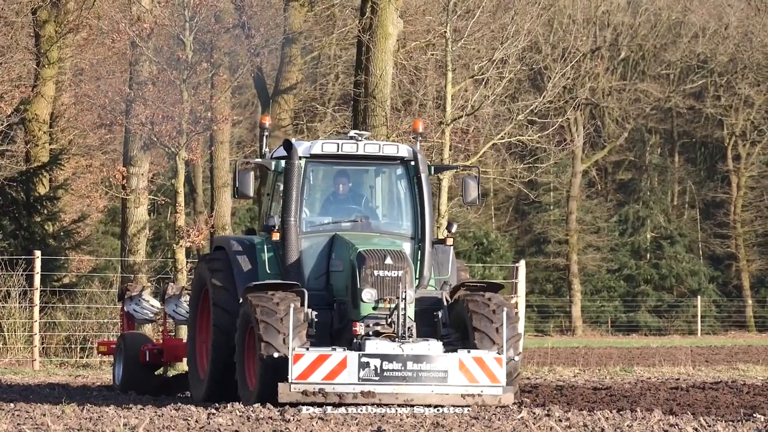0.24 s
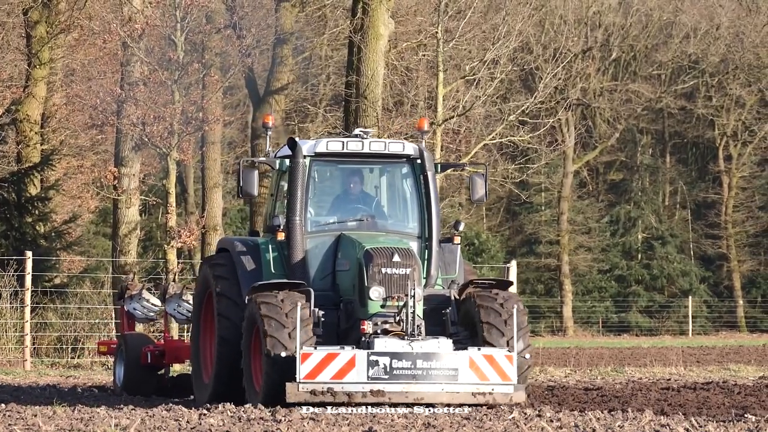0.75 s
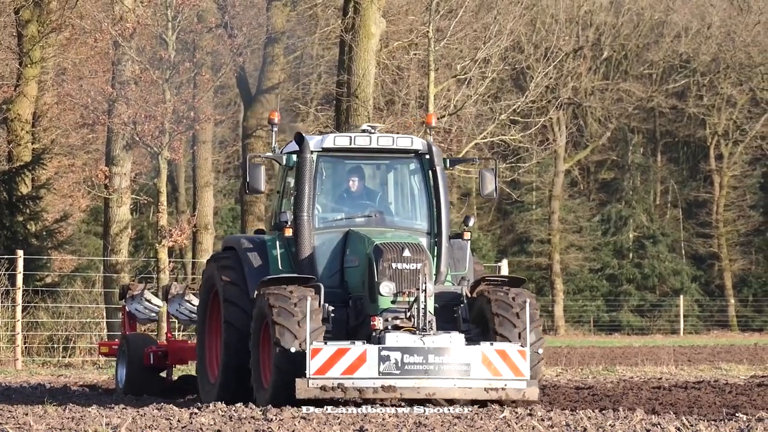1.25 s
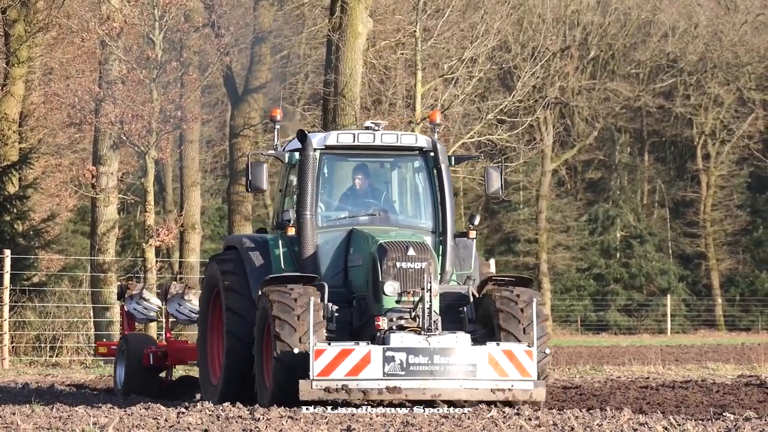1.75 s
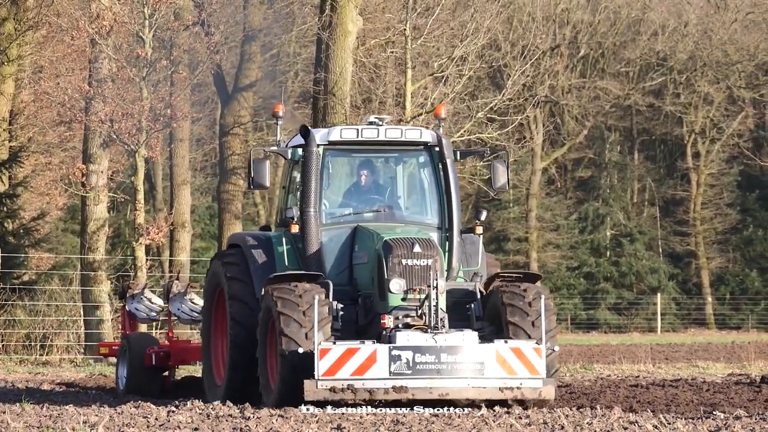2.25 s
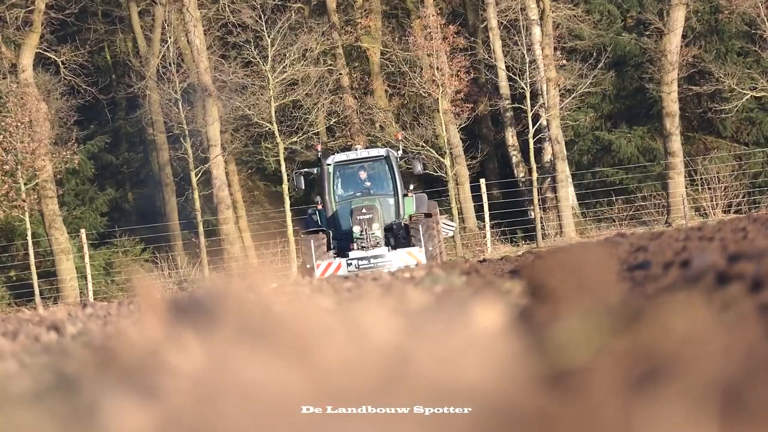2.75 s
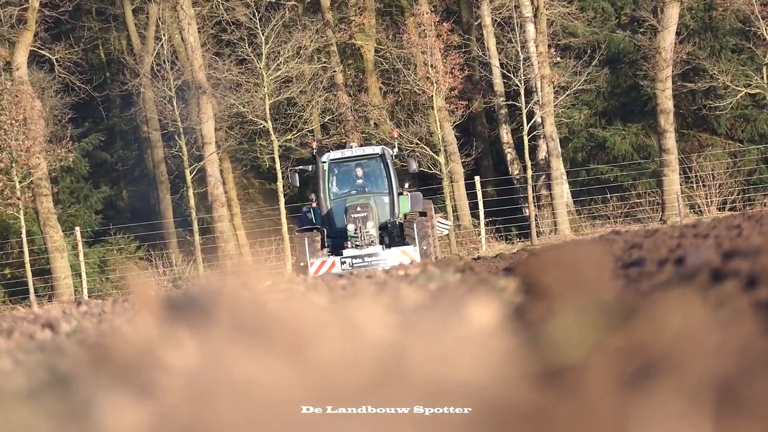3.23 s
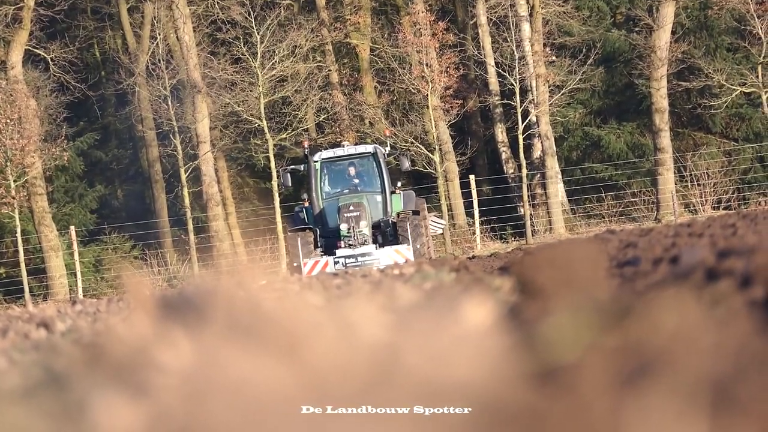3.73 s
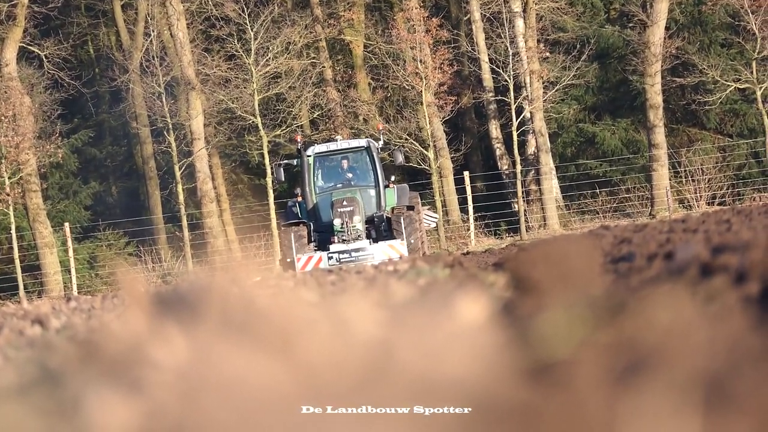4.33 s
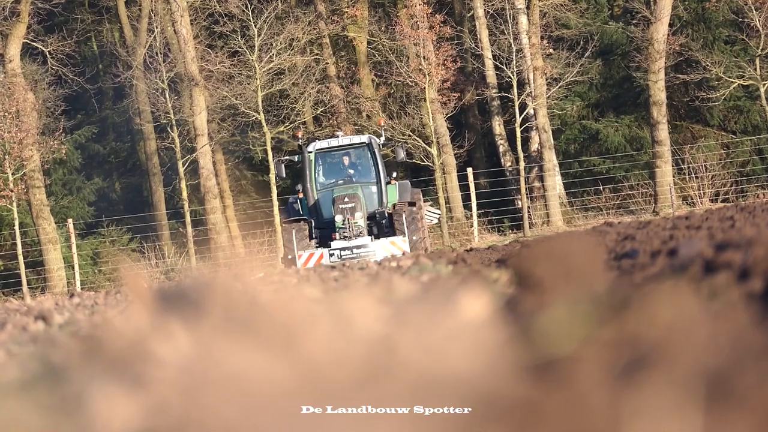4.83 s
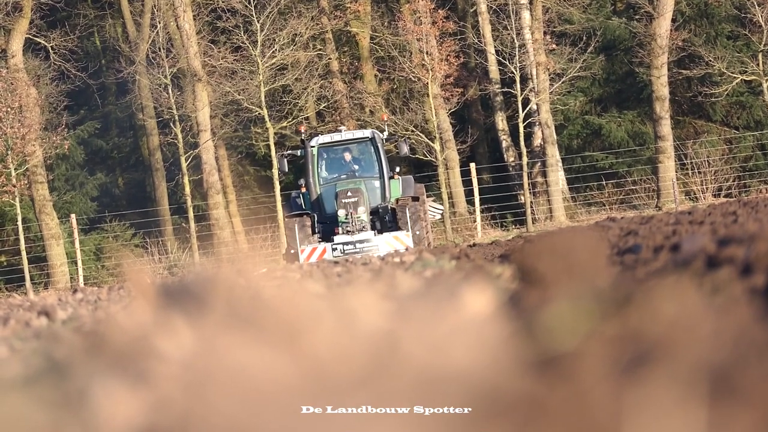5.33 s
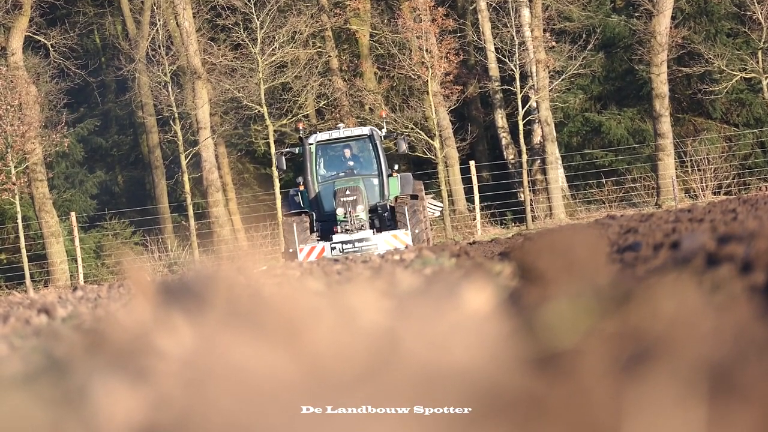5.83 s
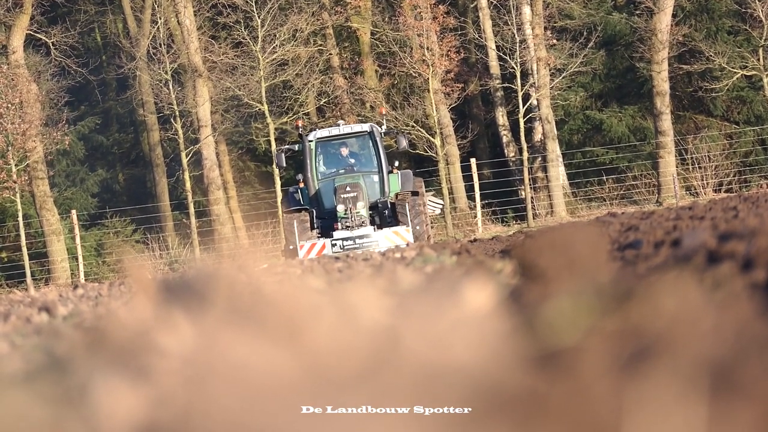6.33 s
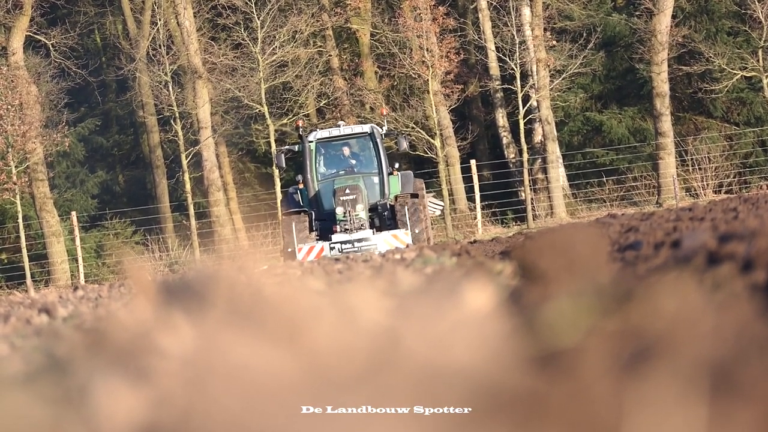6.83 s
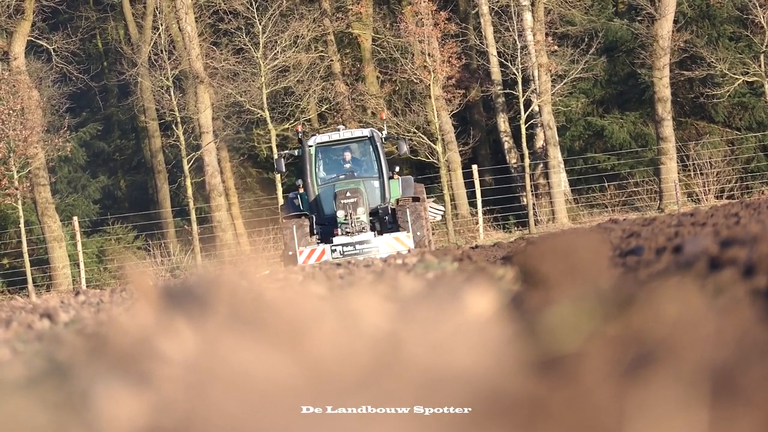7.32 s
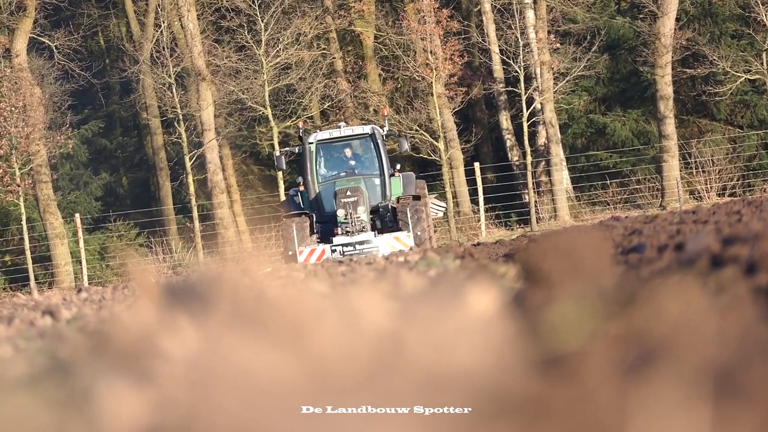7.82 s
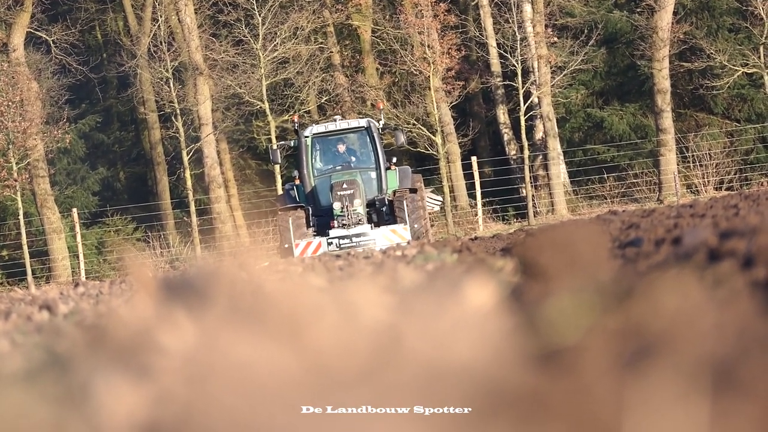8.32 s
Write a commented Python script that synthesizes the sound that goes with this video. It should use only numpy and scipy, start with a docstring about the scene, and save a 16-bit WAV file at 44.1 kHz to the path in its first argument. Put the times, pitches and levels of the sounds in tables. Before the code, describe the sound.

A diesel tractor under load pulls a plough. First close and loud: a dense, uneven, rasping chug, with a sizzling hiss that drops early and a low wind rumble towards the end. A quick crossfade leads to a far view at ground level, where the engine purrs softly and dully, its pace sagging and then rising, with faint high whines, small stone-on-steel chinks and one thin squeal. The tractor stays centred, with slight open-air diffusion.

```python
"""Tractor ploughing, near and far

A four-cylinder diesel pulls a plough across a field. With the microphone close by, every firing is
a thump (filtered click) with a barking, rasping puff of exhaust (gated noise), over rumble and sizzle.
Then the scene cuts to a spot low on the soil, far off: a soft throb under a wash of engine noise,
a hollow drone, ticks and thin whines (wavering tones), and chinks and one squeal of the plough.
Faint hiss lies under both views, and each has a faint, diffuse stereo tail."""
import sys
import numpy as np
from scipy import signal
from scipy.fft import rfft, irfft, next_fast_len
from scipy.io import wavfile

SR = 44100
rng = np.random.default_rng(int(sys.argv[2]) if len(sys.argv) > 2 else 0)


def wav_out(sig):
    """Save sig, one row per channel (or a flat mono array), as 16-bit PCM at SR to the path in sys.argv[1]."""
    wavfile.write(sys.argv[1], SR, np.round(np.clip(np.atleast_2d(sig).T, -1, 1) * 32767).astype(np.int16))


N = 377937
T = np.arange(N) / SR  # time of every sample [s]

# Engine pace in each view, sagging and recovering with the pull: (time [s], firing rate [1/s])
NEAR_SPEED = [(0.0, 42.95), (0.17, 43.97), (0.97, 44.61), (1.4, 42.55), (1.59, 42.3), (2.03, 42.92),
              (2.25, 44.13), (2.48, 42.01), (2.7, 42.05)]
FAR_SPEED = [(2.66, 49.9), (3.28, 49.12), (3.7, 50.56), (3.96, 49.94), (4.53, 47.77), (4.69, 46.47),
             (5.31, 53.29), (5.98, 52.21), (6.11, 51.42), (6.66, 52.57), (7.2, 54.16), (7.8, 53.23),
             (7.98, 52.3), (8.57, 53.3)]
# Cylinders in firing order: (thump [dB], puff [dB], lateness [firing intervals])
CYLINDERS = [(-0.6, -1.5, 0.0093), (-1.7, -2, -0.0028), (-0.4, -0.66, -0.019), (0, -1, -0.0039)]
# Firings that stand out close by: (time [s], extra bark [dB], extra rasp [dB])
STANDOUT_FIRINGS = [(.159, 1, 0.5), (.524, -2, 4.5), (.68, -2, 5), (1.337, 7, 2.5), (1.43, 3, -1.5),
                    (1.549, 2.5, 1.5), (1.597, 4, 3.5), (1.902, 7.5, -2), (2.065, 7, 3.5), (2.272, 3.5, 3),
                    (2.34, 4, -0.5), (2.457, 6.5, 1), (2.55, 9, 2.5), (2.623, 1, 3.5)]
# How hard the engine works close by: (time [s], thump level [dB], rasp level [dB])
NEAR_EFFORT = [(0.0, -27.5, -34.5), (0.67, -28, -34), (0.9, -30.5, -36.5), (1.02, -28.5, -33.5),
               (1.22, -27.5, -36), (1.37, -27.0, -32.5), (1.86, -28.0, -35), (2.7, -29, -37)]
# Level of the thump far off: (time [s], level [dB])
FAR_THUMP = [(2.7, -43), (3.9, -43.5), (4.41, -41), (5.26, -43), (5.38, -45.0), (6.85, -42), (7.74, -46),
             (7.95, -43.5), (8.57, -43.5)]
# Spectra, only their shape counts: (frequency [Hz], level [dB])
NEAR_PIPE = [(20, -68), (44, -16.5), (70, -7), (87, 0.5), (130, -4.5), (174, -2.5), (215, -4), (260, -23.5),
             (400, -23), (700, -25.5), (1500, -54), (3000, -83)]  # thump close by
FAR_PIPE = [(20, -35), (51, -8), (100, 1), (155, -2), (205, -11.5), (255, -25), (380, -38), (480, -49),
            (1500, -69), (3000, -98)]  # thump over the soil
BARK = [(60, -28), (140, -17), (200, -3), (260, -7.5), (400, -12.5), (600, -6.5), (900, -1), (1050, 0),
        (1170, 2.5), (1380, -4.5), (1850, -7), (2400, -22), (4500, -67)]  # lower part of the puff
RASP = [(900, -46), (1800, -9.5), (2200, 1), (2600, -4), (2930, 2.5), (3250, -4.5), (3650, -2.5),
        (4200, -14), (5100, -20.5), (5500, -25.5), (6200, -47), (7300, -41), (10500, -42.5), (14000, -95)]  # upper part of the puff
WASH = [(15, -7), (30, 12.5), (70, 4), (130, 5.5), (230, 7.5), (380, 5), (550, 0), (800, -2), (1150, 0),
        (1600, -4), (2000, -8), (2500, -9), (3000, -15.5), (3650, -16.5), (4400, -26), (7000, -43)]  # diffuse engine noise far off
RUMBLE = [(30, -37), (110, -7.5), (160, -2), (195, 4.5), (240, -2), (295, -1), (350, -8), (420, -9),
          (900, -52.5)]  # engine block and running gear
SIZZLE = [(2500, -36), (3350, -12), (3520, 16.5), (3650, -18), (3820, 10.5), (4200, 1), (5100, -5),
          (5480, -0.5), (6250, -9.5), (6520, -11.5), (6780, -14), (6940, -16), (7300, -27), (14000, -58)]  # narrow resonances of turbocharger and fan
HISS = [(30, -19), (3000, 2.5), (6000, 1.5), (10000, 0), (15500, -2.5)]  # even background hiss
# Hollow hum of the distant engine: (frequency [Hz], stray [Hz], level [dB])
DRONE = [(286, 6, -54), (344, 2.42, -60)]
# Thin whines of the drive: (frequency [Hz], width [Hz], level [dB], flutter [dB])
WHINES = [(2810, 66, -71.5, 4.5), (1640, 64, -71.5, 0), (3650, 70.6, -80, 5)]
# Short chinks, probably stones against the plough: (time [s], frequency [Hz], level [dB])
CHINKS = [(5.422, 3820, -53.5), (5.483, 3740, -55.5), (5.724, 2550, -52), (6.112, 3740, -62.5),
          (6.179, 3250, -61), (6.557, 2590, -54), (7.40, 3920, -65), (7.755, 3640, -60)]

CUT_S, CUT_LENGTH_S = 2.668, 0.057  # the near view fades into the far one
NEAR_START, FAR_START = 0.150, 0.886  # share of a firing interval already gone as each view starts
BARK_DB, BARK_FOLLOWS = -30.5, 0.43  # mean level; rise per dB that the rasp gains
WASH_DB, WASH_FOLLOWS = -49, 0.2  # mean level; rise per dB that the thump gains
SIZZLE_DB, SIZZLE_LATE_DB, SIZZLE_DROP_S, SIZZLE_DROP_LENGTH_S = -45.5, -52, 0.7, 0.2
DRONE_SWELL_DB, DRONE_SWELLS_PER_S = 5.5, 6.6
TICK_HZ, TICK_WIDTH_HZ, TICK_LAG_S = 5420, 220, 0.002
TICK_DB, TICK_LATE_DB, TICK_SINKS_S, TICK_SINK_LENGTH_S = -79, -87, 4, 0.3
CHINK_RISE_S, CHINK_T60_S = 0.002, 0.065
SQUEAL_S, SQUEAL_LENGTH_S, SQUEAL_DB = 6.87, 0.48, -70.5
SQUEAL_HZ, SQUEAL_SAG_HZ_PER_S = 3700, 170
EDGE_HZ = 15700  # upper band limit of the recorder


def amp(db):
    """Decibels to gain."""
    return 10 ** (np.asarray(db) / 20)


def evened(x):
    """Scales to rms 1."""
    return x / np.sqrt(np.mean(x ** 2) + 1e-20)


def curves(rows):
    """Each column of a time table, at every sample."""
    s, *columns = np.transpose(rows)
    return [np.interp(T, s, c) for c in columns]


def ramp(s, length_s):
    """Goes from 0 to 1 round the time s."""
    return np.clip((T - s) / length_s + 0.5, 0, 1)


def add(mix, s, sound):
    """Mixes a sound in at time s."""
    part = mix[round(s * SR):][:len(sound)]
    part += sound[:len(part)]


def colour(x, points, causal=1):
    """Filter with the given spectrum, rms 1 out; causal 1 rings after a click, 0 makes a symmetric hump."""
    hz, db = np.transpose(points)
    f = abs(np.fft.fftfreq(16384, 1 / SR))
    log_gain = np.log(amp(np.interp(np.log(f + 1), np.log(hz), db)))
    # the Hilbert transform of the log gain gives the minimum phase
    phase = -causal * signal.hilbert(log_gain).imag
    ring = np.fft.fftshift(np.fft.ifft(np.exp(log_gain + 1j * phase)).real)
    return evened(signal.oaconvolve(x, ring, "same"))


def wander(hz, size=N):
    """Smooth chance curve of rms 1, changing up to about hz times a second."""
    padded = next_fast_len(size + SR)
    f = np.fft.rfftfreq(padded, 1 / SR)
    smooth = irfft(rfft(rng.standard_normal(padded)) / (1 + (f / hz) ** 4), padded)
    return evened(smooth)[:size]


def wavering_tone(hz, width_hz, flutter_db):
    """A tone of rms 1 that strays round the curve hz and flutters in level."""
    turns = np.cumsum(hz + width_hz / 2 * wander(width_hz, len(hz))) / SR
    flutter = amp(flutter_db * wander(hz=59.5, size=len(hz)))
    return evened(np.sin(2 * np.pi * turns) * flutter)


def firings(speed, start):
    """Times of the firings, with the thump and puff dB of the cylinder that fires."""
    turns = np.cumsum(curves(speed)[0]) / SR  # counted in firing intervals
    turns += start - np.interp(speed[0][0], T, turns)
    k = np.arange(np.ceil(turns[0]), turns[-1]).astype(int)
    thump_db, puff_db, late = np.array(CYLINDERS)[k % len(CYLINDERS)].T
    return np.interp(k + late, turns, T), thump_db, puff_db


def scatter(times, spread_db):
    """A chance level for each firing."""
    return spread_db * rng.standard_normal(len(times))


def clicks(times, db):
    """One impulse at each time."""
    at = np.clip(np.round(times * SR).astype(int), 0, N)
    return np.bincount(at, amp(db), N + 1)[:N]


def puffs(times, db, length_s, echo_s, echo, steady):
    """Turbulent noise that surges as each exhaust valve opens, echoes once in the pipe, never quite dies."""
    t = np.arange(-SR // 20, SR // 20) / SR
    surge = np.exp(-abs(t / length_s) ** 3)
    surge += echo * np.exp(-((t - echo_s) / length_s) ** 2)
    flow = signal.oaconvolve(clicks(times, db), surge, "same")
    return np.hypot(flow, steady) * rng.standard_normal(N)


def hiss():
    """Faint even hiss, partly shared by both channels."""
    common, left, right = (colour(rng.standard_normal(N), HISS) for _ in range(3))
    return amp(-71.5) * np.array([left, right]) + amp(-78) * common


def diffuse_tail(x):
    """A faint decaying noise tail after 40 ms, different in each channel."""
    t = np.arange(SR) / SR
    decay = amp(-t * 60 / 0.57)  # falls 60 dB in 0.57 s
    tail = decay * (t > 0.04) * rng.standard_normal((2, len(t)))
    tail = signal.lfilter(*signal.butter(2, 280, "high", fs=SR), tail)
    return signal.oaconvolve(x[None], tail / np.linalg.norm(tail[0]), axes=1)[:, :N]


def breeze():
    """A light gust rumbles on the microphone: low noise under one smooth swell."""
    gust = np.exp(-((T - 2.35) / 0.53) ** 2)
    spectrum = [(8, -6), (25, -2), (60, -1), (150, -27), (1000, -70)]  # (frequency [Hz], level [dB])
    return amp(-42.0) * gust * colour(rng.standard_normal(N), spectrum)


def rumble():
    """The engine block and running gear rumble between the firings: low noise that wavers gently."""
    return amp(-40.5 + 2.2 * wander(hz=2.5)) * colour(rng.standard_normal(N), RUMBLE)


def sizzle():
    """Air rushes through turbocharger and fan: noise in narrow, restless resonances, dropping once."""
    level_db = SIZZLE_DB + (SIZZLE_LATE_DB - SIZZLE_DB) * ramp(SIZZLE_DROP_S, SIZZLE_DROP_LENGTH_S)
    return amp(level_db + 2.8 * wander(hz=60)) * colour(rng.standard_normal(N), SIZZLE)


def whines():
    """Thin, lasting whines of the drive, each a tone that strays a little in pitch."""
    out = np.zeros(N)
    for hz, width_hz, db, flutter_db in WHINES:
        out += amp(db) * wavering_tone(np.full(N, hz), width_hz, flutter_db)
    return out


def drone():
    """A rough low hum in two tones, each straying in pitch and coming in short chance swells."""
    out = np.zeros(N)
    for hz, stray_hz, db in DRONE:
        hum = wavering_tone(hz + stray_hz * wander(hz=9), width_hz=12, flutter_db=3.3)
        swell_db = DRONE_SWELL_DB * np.tanh(wander(DRONE_SWELLS_PER_S))
        out += amp(db) * evened(hum * amp(swell_db))
    return out


def ticks():
    """Each firing brings one high, brief tick of uneven strength, like that of injectors, sinking later."""
    times, _, puff_db = firings(FAR_SPEED, FAR_START)
    level_db = TICK_DB + (TICK_LATE_DB - TICK_DB) * ramp(TICK_SINKS_S, TICK_SINK_LENGTH_S)
    blows = clicks(times + TICK_LAG_S, puff_db + scatter(times, spread_db=3.5))
    t = np.arange(SR // 20) / SR
    ring = signal.oaconvolve(blows, t * np.exp(-t / 0.002))[:N]
    tone = wavering_tone(np.full(N, TICK_HZ), TICK_WIDTH_HZ, flutter_db=1.5)
    return amp(level_db) * evened(ring * tone)


def plough():
    """Steel drags through the soil: rough decaying chinks and one thin squeal that sinks slowly in pitch."""
    out = np.zeros(N)
    t = np.arange(SR // 10) / SR
    ring = np.minimum(t / CHINK_RISE_S, 1) * amp(-60 * t / CHINK_T60_S)
    for s, hz, db in CHINKS:
        tone = wavering_tone(np.full(len(t), hz), width_hz=220, flutter_db=1.0)
        add(out, s, amp(db) * ring * tone)
    t = np.arange(0, SQUEAL_LENGTH_S, 1 / SR)
    squeal = wavering_tone(SQUEAL_HZ - SQUEAL_SAG_HZ_PER_S * t, width_hz=26, flutter_db=4)
    add(out, SQUEAL_S, amp(SQUEAL_DB) * signal.windows.tukey(len(t), 0.22) * squeal)
    return out


def far_tractor():
    """The thump carries, over a diffuse wash of noise that pulses weakly with the firings."""
    times, thump_db, puff_db = firings(FAR_SPEED, FAR_START)
    thump_level_db = curves(FAR_THUMP)[0]
    wash_level_db = WASH_DB + WASH_FOLLOWS * (thump_level_db - thump_level_db.mean())
    thump = colour(clicks(times, thump_db + scatter(times, spread_db=0.2)), FAR_PIPE, causal=0.029)
    wash_db = puff_db + scatter(times, spread_db=3.0)
    # the high steady flow keeps the pulsing weak
    wash = puffs(times + 0.0017, wash_db, length_s=0.0027, echo_s=0.005, echo=0.32, steady=1.75)
    return amp(wash_level_db) * colour(wash, WASH) + amp(thump_level_db) * thump


def near_tractor():
    """Each firing thumps through the silencer, then barks and rasps out of the stack."""
    times, thump_db, puff_db = firings(NEAR_SPEED, NEAR_START)
    thump_level_db, rasp_level_db = curves(NEAR_EFFORT)
    mean_rasp_db = rasp_level_db[T < CUT_S].mean()
    bark_level_db = BARK_DB + BARK_FOLLOWS * (rasp_level_db - mean_rasp_db)

    standout = np.array(STANDOUT_FIRINGS)
    matches = abs(times[:, None] - standout[:, 0]) < 0.01  # firings within 10 ms of a listed time
    extra_bark_db, extra_rasp_db = (matches @ standout[:, 1:]).T

    thump = clicks(times - 0.0004, thump_db + scatter(times, spread_db=0.64))
    thump = colour(thump, NEAR_PIPE, causal=0.36)
    bark_db = puff_db + extra_bark_db + scatter(times, spread_db=0.6)
    bark = puffs(times + 0.00048, bark_db, length_s=0.0036, echo_s=0.0041, echo=0.32, steady=0.32)
    rasp_db = puff_db + extra_rasp_db + scatter(times, spread_db=1.15)
    rasp = puffs(times + 0.0014, rasp_db, length_s=0.0033, echo_s=0.0052, echo=0.3, steady=0.15)
    puff = amp(bark_level_db) * colour(bark, BARK) + amp(rasp_level_db) * colour(rasp, RASP)
    return amp(thump_level_db) * thump + puff


def scene():
    """The near view, then the far one; the tractor stays in the centre."""
    fade = ramp(CUT_S, CUT_LENGTH_S)
    near = breeze() + rumble() + sizzle() + near_tractor()
    far = whines() + drone() + ticks() + plough() + far_tractor()
    near_view = near + amp(-34.5) * diffuse_tail(near)
    far_view = far + amp(-36.5) * diffuse_tail(far)
    return hiss() + (1 - fade) * near_view + fade * far_view


def record(dry):
    """The band limit of the recorder: a steep low-pass."""
    low_pass = signal.firwin(511, EDGE_HZ, window=("kaiser", 9), fs=SR)
    return signal.oaconvolve(dry, low_pass[None], "same")


dry = scene()
out = record(dry)
wav_out(out)
```